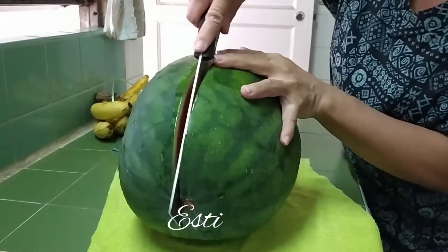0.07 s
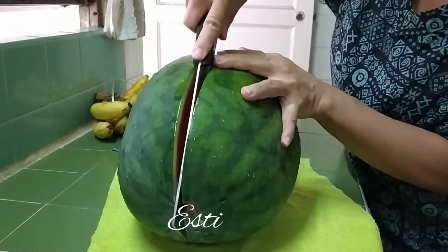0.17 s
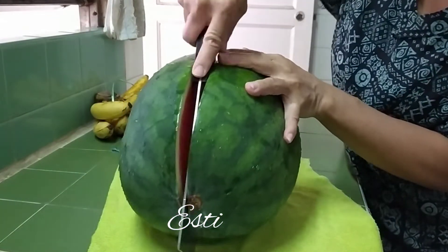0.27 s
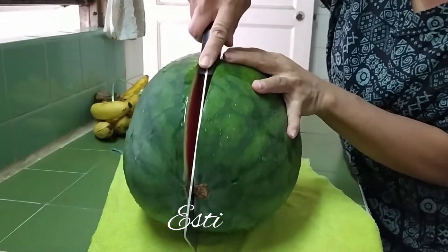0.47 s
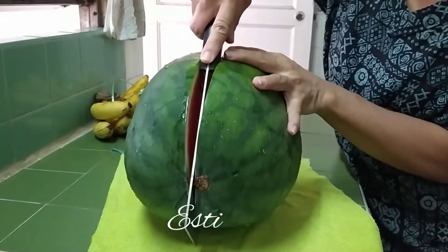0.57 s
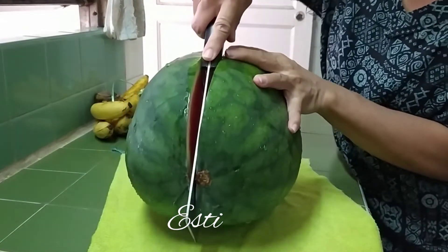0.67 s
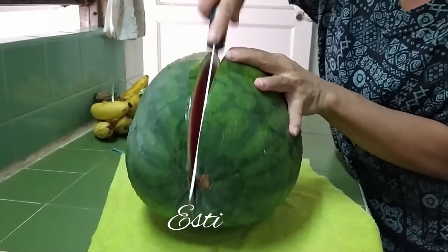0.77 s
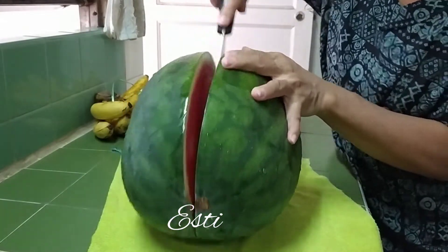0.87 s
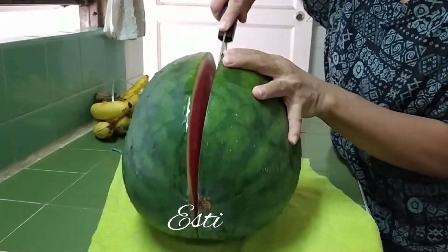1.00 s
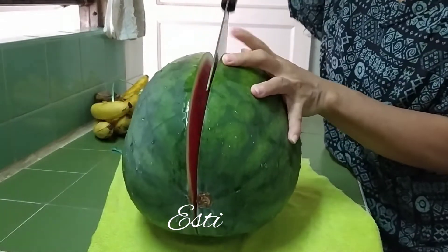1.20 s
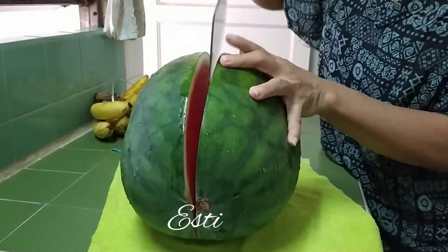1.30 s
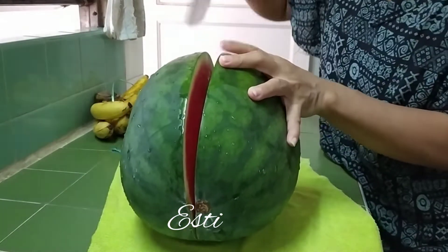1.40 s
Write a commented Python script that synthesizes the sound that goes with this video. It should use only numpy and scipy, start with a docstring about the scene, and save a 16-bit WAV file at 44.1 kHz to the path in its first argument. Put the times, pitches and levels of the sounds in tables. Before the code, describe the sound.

Watermelon rind cracks under a knife, close stereo microphones: quick snap, fine crunch, woody crack and low knock, short echo off tiled walls, then soft wet rubbing as the blade leaves, over quiet room noise.

```python
"""A knife is pushed through a watermelon in a tiled room, heard by a left and a right microphone.
The blade, a snap plus decaying tones, clicks on the rind; random grains make the rind tear with a fine crackle.
Noise bursts crack, then a falling tone and a low push make the thump that leaves melon and room ringing.
Grains with a moving level are the wet blade rubbing, with two late swells as it slides out and smacks.
Coloured noise and a faint whine form the quiet room noise throughout."""
import sys
import numpy as np
from scipy import signal
from scipy.fft import rfft, irfft, next_fast_len
from scipy.io import wavfile

SR = 44100
rng = np.random.default_rng(int(sys.argv[2]) if len(sys.argv) > 2 else 0)


def put_to_file(sound):
    """Save the sound as 16-bit audio at rate SR, in the file named by the first command-line argument."""
    columns = np.atleast_2d(sound).T  # one column per channel
    safe = np.clip(columns, -1, 1)
    whole_steps = np.round(safe * 32767)
    wavfile.write(sys.argv[1], SR, whole_steps.astype(np.int16))


N = 63945
T = np.arange(N) / SR  # time in seconds

# Spectrum of the room noise: pitch_hz, level_db
FLOOR_COLOUR = [(22, 5), (35, -1.5), (50, 1.5), (70, -9.5), (110, -5.5), (155, 1.5), (200, -4), (300, -8),
                (450, -13), (700, -12), (1000, -17.5), (1500, -21.5), (2600, -22.5), (3500, -31.5),
                (6400, -32.5), (9300, -29), (11500, -36), (13000, -38), (16000, -35.5)]
# Left-right likeness of the room noise: pitch_hz, correlation (0 to 1)
FLOOR_LIKENESS = [(30, 0.33), (100, 1), (300, 0.7), (1000, 0.13), (4000, 0.1), (9000, 1), (15000, 1)]
FLOOR_DB = -55.5
WHINE_HZ, WHINE_DB, WHINE_FLUTTER_S = 7460, -70.5, 0.0077

# Level of the blade rubbing in the cut: time_s, level_db
SLIDE_LEVEL = [(0, -56), (.07, -60), (.12, -57.5), (.16, -62), (.205, -49.5), (.25, -71), (.55, -64.5),
               (.775, -69.5), (.805, -57), (.838, -50.5), (.9, -54.5), (.945, -55), (.98, -49.5),
               (1.03, -56), (1.07, -58), (1.13, -66.5), (1.45, -68.5)]
# Spectrum of the rubbing: pitch_hz, level_db
RUB_COLOUR = [(200, -4.5), (900, -7), (2200, -4), (3300, -9.5), (5000, -6), (7400, -6), (9300, 3),
              (11000, -2), (12500, -12.5), (16000, -24)]
SLIDE_GRAINS_PER_S, SLIDE_SPREAD_DB = 20000, 2.5
SLIDE_WOBBLE_DB, SLIDE_WOBBLE_S = 1, 0.013  # the blade drags unevenly
# Wet smacks as the flesh lets go of the blade: start_s, level_db
WET_SMACKS = [(0.9819, -40), (0.9944, -40.5)]
# Spectrum of a smack: pitch_hz, level_db
WET_SMACK_COLOUR = [(200, -14), (700, -3), (1200, 5), (2800, -12.5), (4500, -12), (12000, -35)]
SMACK_T60_S = 0.009

# Blade contacts with the rind: start_s, level_db
BLADE_CLICKS = [(0.2283, -19), (0.231, -21)]
# Spectrum of the snap in a contact: pitch_hz, level_db
SNAP_COLOUR = [(60, -38), (330, -1.5), (750, -18), (1400, -9), (2700, -11), (4200, -18), (6500, -8),
               (8300, -5.5), (9700, -2), (11400, -2), (12800, -26), (16000, -24)]
# Ringing of a contact, low knock of the melon, then the knife: pitch_hz, relative level_db, t60_s
CONTACT_MODES = [(352, -29.5, 0.084), (1000, -22, 0.011), (1455, -18, .02), (9500, -6, 0.0094),
                 (9880, -8, 0.0077)]
CLICK_T60_S = 0.0063

# Level of the tearing rind: time_s, level_db
TEAR_LEVEL = [(.228, -74), (.235, -49), (.258, -46.5), (.278, -49), (.297, -38.5), (.307, -39.5),
              (.311, -34), (.324, -37), (.333, -37), (.345, -42), (.37, -63), (.42, -100)]
# Spectrum of the tearing fibres: pitch_hz, level_db
FIBRE_COLOUR = [(150, -7), (400, -4), (1400, -5.5), (3000, -12), (5500, -7), (7200, -5), (8200, 0),
                (9500, 1), (11300, -5), (13000, -13), (16000, -22)]
TEAR_GRAINS_PER_S, TEAR_SPREAD_DB = 12000, 1
# Cracks in the rind: start_s, level_db, t60_s
RIND_CRACKS = [(0.3113, -40.5, 0.033), (0.3319, -25.5, 0.052), (0.3331, -21.5, 0.04), (0.347, -41, 0.022)]
# Spectrum of a crack: pitch_hz, level_db
RIND_CRACK_COLOUR = [(40, -56), (110, -4), (250, -5), (550, 2), (820, -2.5), (1100, 3.5), (1420, 9.5),
                     (1700, -4), (2400, -9.5), (2900, -4), (3800, -15), (6000, -16), (12000, -62)]

# Falling tone as the split runs through the melon: time_s, pitch_hz, level_db
SPLIT_TONE = [(.3305, 1375, -47), (0.3349, 1211, -16), (0.3367, 982, -23.5), (0.3375, 462, -14),
              (0.3395, 379, -18.5), (0.3411, 375, -17), (0.342, 300, -49)]
# Low push as the halves spring apart
PUSH_S, PUSH_HZ, PUSH_WIDTH_S, PUSH_DB = 0.3366, 263.5, 0.0031, -20.5
RIGHT_LAG_S = 0.00017  # the split reaches the right microphone this much later

# Ringing of the melon on its counter: pitch_hz, level_db, t60_s
MELON_MODES = [(111.8, -44.5, 0.56), (170.4, -36, 0.52), (206.7, -39, 0.64), (268.7, -28.5, 0.43),
               (345, -40, 0.69), (390, -31.5, 0.23), (437.4, -30.5, 0.4), (488, -41, 0.39),
               (515, -33, 0.32), (583, -36.5, 0.44), (693, -41, 0.49), (1130, -45, 0.16),
               (1368, -40.5, 0.49), (1452, -37, 0.21)]
RING_DELAY_S, RING_ATTACK_S = 0.00607, 0.0046

# Decay of the room: pitch_hz, t60_s
ROOM_DECAY = [(100, 1), (300, 0.55), (1300, .55), (2800, 0.66), (5000, 0.28), (8500, 0.46), (11000, 0.32),
              (14000, 0.2)]
# Spectrum of the reverberation: pitch_hz, level_db
ROOM_COLOUR = [(100, -1), (300, -2.5), (800, -3.5), (1400, 0.5), (2800, 3), (5000, -1), (8500, 0),
               (11000, -3.5), (14000, -1)]
# Left-right likeness of the reverberation and ringing: pitch_hz, correlation (0 to 1)
ROOM_LIKENESS = [(100, 1), (300, 0.87), (700, 0.42), (1500, 0.033), (9000, 0.72)]
# Left-right likeness of the direct noisy sounds: pitch_hz, correlation (0 to 1)
DIRECT_LIKENESS = [(200, 1), (1000, 0.47), (3000, 0.2), (9000, 0.62), (14000, 0.25)]
# Stereo balance of the cut: pitch_hz, left_minus_right_db
BALANCE = [(100, 0), (400, -0.1), (2000, -1.5), (5000, 0.1), (9000, -2), (14000, 6.5)]
ROOM_ONSET_S = 0.0031
TOP_HZ = 15850
LEFT_RIGHT_SIGN = np.array([[1], [-1]])


def amp(db):
    """Decibels to a linear gain."""
    return 10 ** (np.asarray(db) / 20)


def unit(x):
    """Scale to rms 1."""
    return x / np.sqrt(np.mean(x ** 2) + 1e-20)


def along(points, hz):
    """Read (pitch_hz, value) points on a log frequency axis."""
    f, value = np.transpose(points)
    return np.interp(np.log(hz + 1), np.log(f + 1), value)


def swell(rows):
    """Gain over time from rows that start with time_s and end with level_db, silent outside them."""
    rows = np.array(rows)
    inside = (T >= rows[0, 0]) & (T <= rows[-1, 0])
    return amp(np.interp(T, rows[:, 0], rows[:, -1])) * inside


def fade(start_s, t60_s):
    """Sudden start and exponential decay, down 60 dB after t60_s."""
    return (T >= start_s) * np.exp(-np.log(1000) * np.maximum(T - start_s, 0) / t60_s)


def filtered(x, response):
    """Shape x by a complex response of frequency."""
    m = next_fast_len(N + SR // 2)
    spectrum = rfft(x, m) * response(np.fft.rfftfreq(m, 1 / SR))
    return irfft(spectrum, m)[..., :N]


def half_angle(likeness, hz):
    """Angle that mixes mid and side so that left and right correlate by the given likeness."""
    return np.arccos(np.clip(along(likeness, hz), -1, 1)) / 2


def stereo(pair, colour, likeness):
    """Two unrelated signals become left and right with a colour and a likeness."""
    def mid_side(hz):
        angle = half_angle(likeness, hz)
        return amp(along(colour, hz)) * [np.cos(angle), np.sin(angle)]

    mid, side = filtered(pair, mid_side)
    return np.array([mid + side, mid - side])


def noise(colour, likeness):
    """Steady coloured stereo noise of rms 1."""
    return unit(stereo(rng.standard_normal((2, N)), colour, likeness))


def wobble(seconds):
    """A random curve of rms 1; a longer time makes it change more slowly."""
    return unit(filtered(rng.standard_normal(N), lambda hz: np.exp(-(hz * seconds) ** 2)))


def grains(per_s, spread_db, colour):
    """Tiny snaps of uneven size at random moments, coloured, rms 1."""
    size = amp(spread_db * np.minimum(rng.exponential(size=N), 4))
    happens = rng.random(N) < per_s / SR
    snaps = happens * size * rng.standard_normal((2, N))
    return unit(stereo(snaps, colour, DIRECT_LIKENESS))


def burst(start_s, t60_s, colour):
    """A snap of noise that starts near rms 1 and dies away, heard through a colour."""
    white = rng.standard_normal((2, N))
    steady_rms = stereo(white, colour, DIRECT_LIKENESS).std()
    return stereo(white * fade(start_s, t60_s), colour, DIRECT_LIKENESS) / steady_rms


def background():
    """Quiet room noise with a thin whine, a tone roughened by random flutter."""
    whine = wobble(WHINE_FLUTTER_S) * np.sin(2 * np.pi * WHINE_HZ * T)
    return amp(FLOOR_DB) * noise(FLOOR_COLOUR, FLOOR_LIKENESS) + amp(WHINE_DB) * whine


def slide():
    """The wet blade rubs along the cut in many tiny snaps and smacks as it comes free."""
    drag = swell(SLIDE_LEVEL) * amp(SLIDE_WOBBLE_DB * wobble(SLIDE_WOBBLE_S))
    rub = drag * grains(SLIDE_GRAINS_PER_S, SLIDE_SPREAD_DB, RUB_COLOUR)
    smacks = sum(amp(db) * burst(s, SMACK_T60_S, WET_SMACK_COLOUR) for s, db in WET_SMACKS)
    return rub + smacks


def clicks():
    """The blade jumps against the rind twice in quick succession: a snap and a short ring each time."""
    out = np.zeros((2, N))
    for start_s, level_db in BLADE_CLICKS:
        ring = 0
        for hz, mode_db, t60_s in CONTACT_MODES:
            ring = ring + amp(mode_db) * fade(start_s, t60_s) * np.sin(2 * np.pi * hz * (T - start_s))
        snap = burst(start_s, CLICK_T60_S, SNAP_COLOUR)
        out += amp(level_db) * (ring + snap)
    return out


def rind():
    """Fibres tear in a crackle of tiny snaps, and the rind cracks in short noise bursts."""
    tear = swell(TEAR_LEVEL) * grains(TEAR_GRAINS_PER_S, TEAR_SPREAD_DB, FIBRE_COLOUR)
    cracks = sum(amp(db) * burst(s, t60_s, RIND_CRACK_COLOUR) for s, db, t60_s in RIND_CRACKS)
    return tear + cracks


def split():
    """The opening gap sounds a fast falling tone, and the halves give one low push."""
    time_s, pitch_hz, _ = np.transpose(SPLIT_TONE)
    pitch = np.interp(T, time_s, pitch_hz) * (T >= time_s[0])
    fall = swell(SPLIT_TONE) * np.sin(2 * np.pi * np.cumsum(pitch) / SR)
    age = T - PUSH_S
    bump = np.exp(-(age / PUSH_WIDTH_S) ** 2 / 2)
    push = amp(PUSH_DB) * bump * np.cos(2 * np.pi * PUSH_HZ * age)
    # left comes half the lag early, right half the lag late
    return filtered(fall + push, lambda hz: np.exp(1j * np.pi * hz * RIGHT_LAG_S * LEFT_RIGHT_SIGN))


def ringing():
    """The melon and the counter ring on in decaying modes, with phases set apart between the microphones."""
    start_s = PUSH_S + RING_DELAY_S
    age = np.maximum(T - start_s, 0)
    out = np.zeros((2, N))
    for hz, level_db, t60_s in MELON_MODES:
        apart = half_angle(ROOM_LIKENESS, hz) * rng.choice([-1, 1])
        phase = 2 * np.pi * rng.random() + apart * LEFT_RIGHT_SIGN
        out += amp(level_db) * fade(start_s, t60_s) * np.sin(2 * np.pi * hz * age + phase)
    return out * (1 - np.exp(-age / RING_ATTACK_S))


def room(x):
    """The answer of the tiled walls: a noise tail in which each frequency dies at its own speed."""
    hz, t, z = signal.stft(rng.standard_normal((2, N)), SR, nperseg=256)
    decay = np.exp(-np.log(1000) * t / along(ROOM_DECAY, hz)[:, None])
    # equal energy at every frequency before the colour
    decay /= np.sqrt(np.sum(decay ** 2, axis=1, keepdims=True) * t[1] * SR)
    onset = 1 - np.exp(-(T / ROOM_ONSET_S) ** 2)
    tail = signal.istft(z * decay, SR, nperseg=256)[1][:, :N] * onset
    answer = stereo(tail, ROOM_COLOUR, ROOM_LIKENESS)
    return signal.fftconvolve(x.mean(axis=0)[None], answer, axes=1)[:, :N]


def in_room(x, wet_db):
    """A direct sound together with its reverberation."""
    return x + amp(wet_db) * room(x)


def scene():
    """The cut in its tiled room, balanced slightly to the right over most pitches, over the room noise."""
    melon = in_room(clicks(), wet_db=-2.5)
    melon += in_room(rind(), wet_db=0.44)
    melon += in_room(split(), wet_db=-0.4)
    melon += in_room(slide(), wet_db=-2)
    melon += ringing()
    placed = filtered(melon, lambda hz: amp(along(BALANCE, hz) / 2 * LEFT_RIGHT_SIGN))
    return placed + background()


def record(dry):
    """The recorder keeps nothing above its band limit."""
    return filtered(dry, lambda hz: hz < TOP_HZ)


dry = scene()
out = record(dry)
put_to_file(out)
```